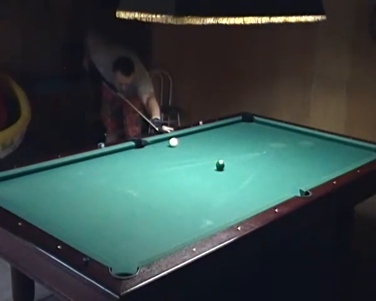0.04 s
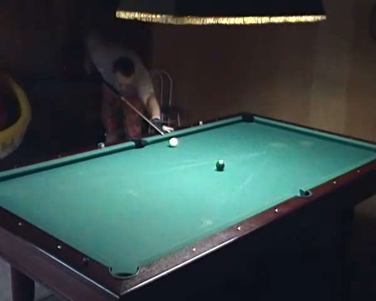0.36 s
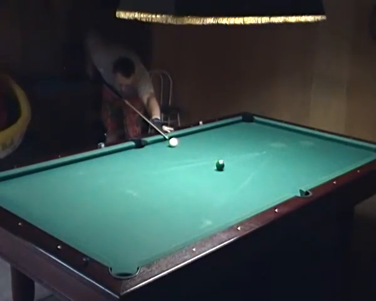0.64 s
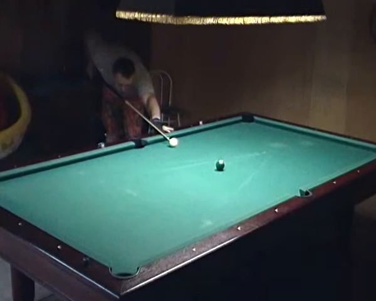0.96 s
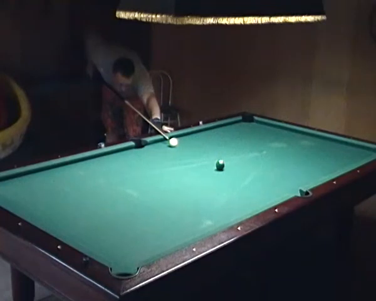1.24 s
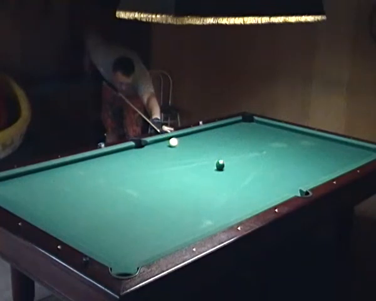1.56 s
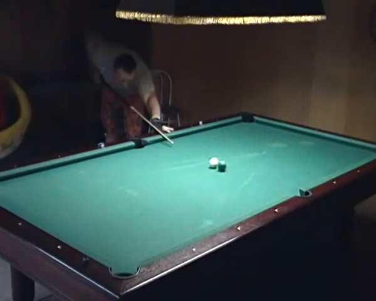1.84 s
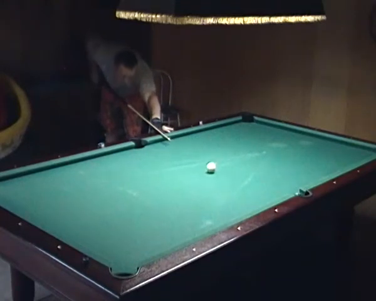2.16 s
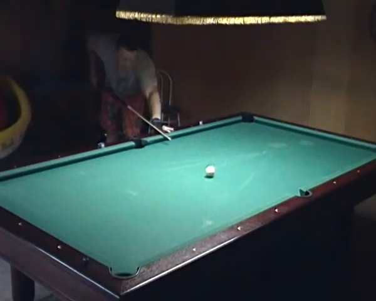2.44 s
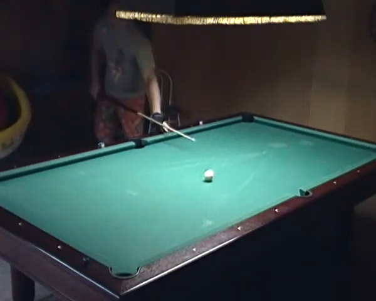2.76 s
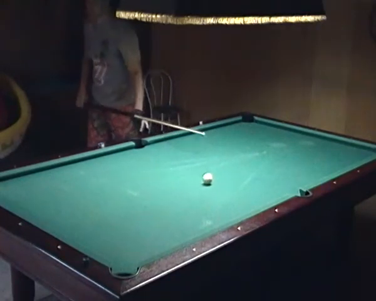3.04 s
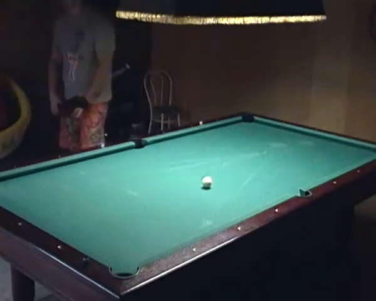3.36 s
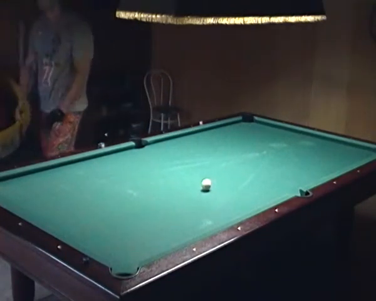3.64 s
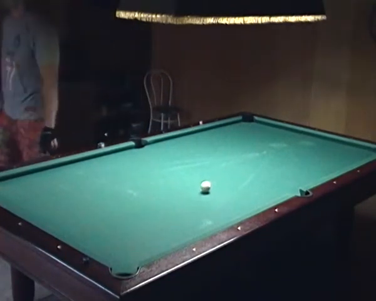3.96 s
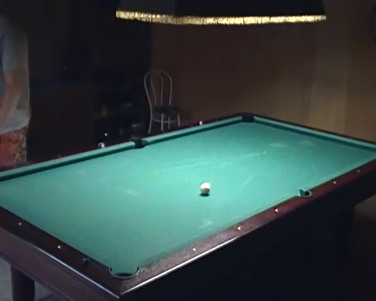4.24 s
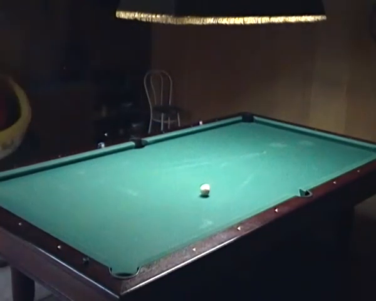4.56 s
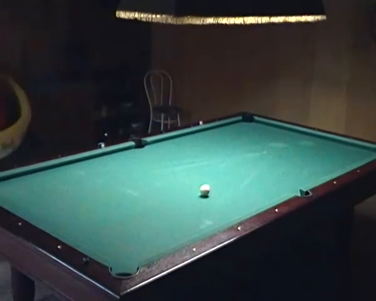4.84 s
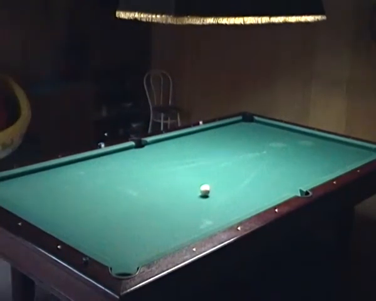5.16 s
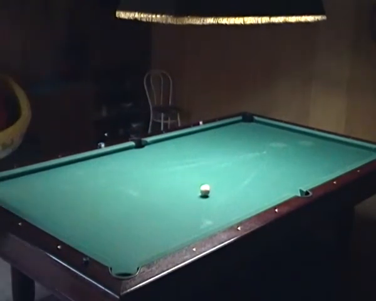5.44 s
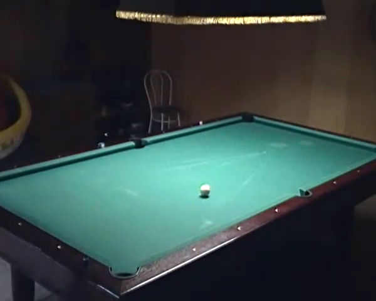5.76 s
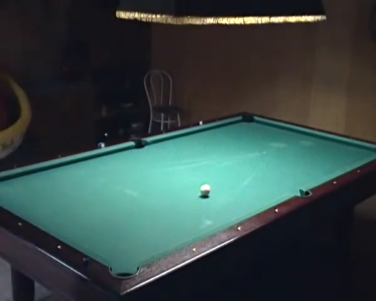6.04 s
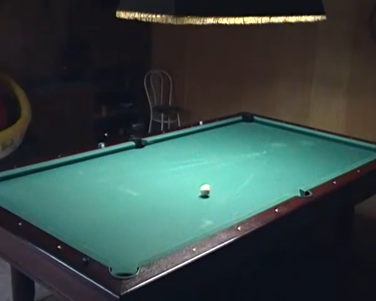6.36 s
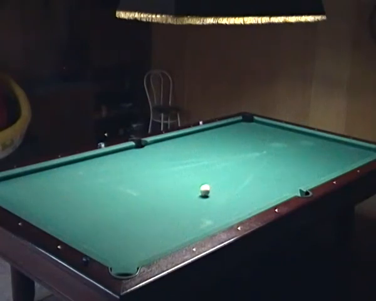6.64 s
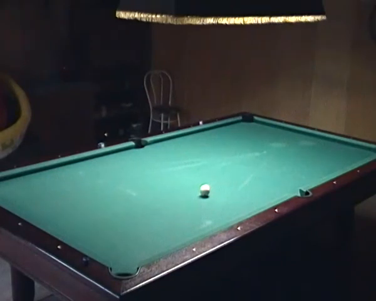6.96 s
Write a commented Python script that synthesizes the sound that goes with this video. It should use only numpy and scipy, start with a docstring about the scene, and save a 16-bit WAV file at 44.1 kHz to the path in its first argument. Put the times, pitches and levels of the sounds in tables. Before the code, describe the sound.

In a quiet games room with faint hiss and hum, a cue thuds against a pool ball. It slides briefly and clacks sharply into another, which slams into a pocket, knocks against other balls and rumbles down the chute. The player then shuffles off in softly slapping, skidding sandals, and something wooden knocks once. The microphone sounds slightly dull, and the loud hits are squashed, with a short room echo behind them.

```python
"""A pool shot in a quiet games room. Over air noise, hum and low rumble, the cue's impact rings shaft and
ball. The ball slides on the cloth and clacks into a second, which slams into a pocket, rings the table's
frame, knocks on the balls lying there and rumbles down the chute. The player shuffles off, soles slapping
and skidding, and something wooden knocks. Throughout, a limiter squashes the loud blows and, as it
recovers, lets the room's reverberation swell up behind them."""
import sys
import numpy as np
from scipy import signal
from scipy.fft import rfft, irfft, next_fast_len
from scipy.io import wavfile

SR = 44100
rng = np.random.default_rng(int(sys.argv[2]) if len(sys.argv) > 2 else 0)


def output_pcm(signal):
    """Save a mono or channel-first signal as 16-bit PCM at the path in sys.argv[1].

    Samples are clipped to [-1, 1] before scaling.
    """
    pcm = np.clip(np.atleast_2d(signal).T, -1, 1) * 32767
    wavfile.write(sys.argv[1], SR, np.round(pcm).astype(np.int16))


N = 313551
TIME = np.arange(N) / SR
EVENT_TIME = TIME[:SR // 2]


def amp(db):
    """Decibels to amplitude ratio."""
    return 10 ** (np.asarray(db) / 20)


def unit_rms(x):
    """Power normalisation to rms 1."""
    return x / np.sqrt(np.mean(x ** 2) + 1e-20)


def as_blow(x):
    """Energy normalisation to that of 10 ms at rms 1."""
    return x * np.sqrt(SR / 100 / np.sum(np.atleast_2d(x) ** 2, 1).mean())


def curve_at(points, hz):
    """Interpolation over log frequency."""
    known_hz, value = np.transpose(points)
    return np.interp(np.log(hz + 1), np.log(known_hz + 1), value)


def add(mix, start_s, sound):
    """Superposition: a sound joins the mix at its start time."""
    part = mix[:, round(start_s * SR):][:, :sound.shape[-1]]
    part += sound[..., :part.shape[1]]


def colour(x, spectrum, tilt_db=0, size=4096):
    """Minimum-phase filter with the given spectrum, tilted by tilt_db per octave about 2 kHz."""
    hz = abs(np.fft.fftfreq(size, 1 / SR))
    octaves = np.log2(np.maximum(hz, 200) / 2000)
    log_gain = np.log(amp(curve_at(spectrum, hz) + tilt_db * octaves))
    response = np.exp(np.conj(signal.hilbert(log_gain)))
    taps = np.fft.ifft(response).real[:size // 2]
    return signal.oaconvolve(np.atleast_2d(x), taps[None], axes=1)[:, :x.shape[-1]]


def band(x, hz, width_hz):
    """Two equal resonators in cascade, scaled to rms 1."""
    b, a = signal.iirpeak(hz, hz / width_hz, SR)
    return unit_rms(signal.lfilter(b, a, signal.lfilter(b, a, x)))


# Left-right likeness of a diffuse field: frequency_hz, coherence
FIELD_COHERENCE = [(100, 1), (600, 0.99), (1500, 0.98), (3000, 0.96), (5000, 0.81), (9000, 0.13)]
def diffuse(count, coherence=FIELD_COHERENCE):
    """Spatial coherence: white noise at two close microphones is alike in the bass, less in the treble."""
    size = next_fast_len(count)
    mid, side = rfft(rng.standard_normal((2, size)))
    alike = np.clip(curve_at(coherence, np.fft.rfftfreq(size, 1 / SR)), -1, 1)
    mid, side = mid * np.sqrt((1 + alike) / 2), side * np.sqrt((1 - alike) / 2)
    return irfft(np.array([mid + side, mid - side]), size)[:, :count]


def decay(t60):
    """Exponential damping: 60 dB down after t60 seconds."""
    return np.exp(-np.log(1000) * EVENT_TIME / np.maximum(t60, .001))


def burst(t60):
    """Scattering: a dying spray of tiny contacts or near reflections, whitened to favour no pitch."""
    spray = rfft(diffuse(len(EVENT_TIME)) * decay(t60))
    magnitude = np.sqrt(np.mean(abs(spray) ** 2, 0) + 1e-20)
    return as_blow(irfft(spray / magnitude, len(EVENT_TIME)) * decay(4 * t60))


def ring(modes, spread_db=0, detune=0):
    """Damped modes: the place of the blow varies their strength, the ball's weight shifts their pitch."""
    chance = rng.standard_normal((len(modes), 2))
    out = 0
    for k, ((hz, db, t60), (place, load)) in enumerate(zip(modes, chance)):
        tone = np.sin(2 * np.pi * hz * (1 + detune * load) * EVENT_TIME)
        out += (-1) ** k * amp(db + spread_db * place) * decay(t60) * tone
    return out


def grainy(grain_db, catches_per_s, grid_hz=2000):
    """Amplitude modulation of noise by small random catches of uneven strength."""
    grid_s = np.arange(0, 8, 1 / grid_hz)
    catches = rng.exponential(1, len(grid_s)) * (rng.random(len(grid_s)) < catches_per_s / grid_hz)
    return diffuse(N) * np.interp(TIME, grid_s, amp(grain_db * np.minimum(catches, 3)))


def strokes(rows, attack_s, sag_db, release_s):
    """Envelope for rows of start_s, length_s, level_db: each rises, sags over its length, then decays."""
    gain = np.zeros(N)
    for start, length, db in rows:
        age = np.maximum(TIME - start, 0)
        held = np.minimum(age / attack_s, 1) * amp(db - sag_db * np.minimum(age / length, 1))
        gain += held * np.exp(-np.maximum(age - length, 0) / release_s)
    return gain


def walking(start_s=3.37, ease_s=0.45):
    """Linear ramp: 0 while the player stands, 1 once the walk is under way."""
    return np.clip((TIME - start_s) / ease_s, 0, 1)


# Spectrum of room air and microphone hiss: frequency_hz, gain_db
AIR_SPECTRUM = [(12, -57), (20, -2.5), (92, 1.5), (168, -15), (203, -5.5), (226, -8), (259, -14),
                (572, -15), (692, -14.5), (934, -16.5), (1130, -17), (3180, -22), (8040, -24.5),
                (11800, -27), (13500, -66)]
# Left-right likeness of that noise: frequency_hz, coherence
AIR_COHERENCE = [(60, 1), (180, 0.65), (550, 0.32), (1650, 0.25), (4970, 0.072), (15000, 0.048)]
# Swells of the low rumble: start_s, length_s, level_db
RUMBLE_SWELLS = [(1.4, 0.15, -30.5), (1.7, 0.37, -39), (4.4, 1.1, -47.5), (5.56, 0.12, -33),
                 (6.15, 0.19, -37.5), (6.87, .17, -38)]
def background(hum_hz=199.8, whine_hz=7840, still_db=-45, walk_rise_db=4.5, rumble_trim_db=-3):
    """Noise floor: broadband air and hiss, a pure hum, and narrowband noise as whine and uneven rumble."""
    air = amp(-41.5) * unit_rms(colour(diffuse(N, AIR_COHERENCE), AIR_SPECTRUM))
    hum = amp(-53) * unit_rms(np.sin(2 * np.pi * hum_hz * TIME))
    whine = amp(-66.5) * band(rng.standard_normal(N), whine_hz, width_hz=37)
    sway = amp(still_db + walk_rise_db * walking())
    sway += strokes(RUMBLE_SWELLS, attack_s=0.082, sag_db=4, release_s=0.049)
    rumble = amp(rumble_trim_db) * sway * band(diffuse(N), hz=46, width_hz=67)
    return air + hum + whine + rumble


# Reverberation time of the room: frequency_hz, t60_s
ROOM_DECAY = [(100, 0.6), (500, 0.45), (1200, 0.4), (2500, 0.35), (5000, 0.29), (12000, 0.13)]
def reverberation(x, gap_s=0.0084, paths=3, handover_s=0.07):
    """Wall reflections follow a gap and decay band by band; moving sources reach other echo paths."""
    out = np.zeros((2, N))
    for k in range(paths):
        hz, age, bands = signal.stft(diffuse(SR // 2), SR, nperseg=256)
        absorption = np.exp(-np.log(1000) * age / curve_at(ROOM_DECAY, hz)[:, None])
        tail = signal.istft(bands * absorption, SR, nperseg=256)[1]
        tail *= np.interp(TIME[:tail.shape[1]], [0, gap_s, gap_s + 0.0007], [.15, .25, 1])
        turn = (TIME / handover_s + k) % paths
        share = np.sin(np.pi / 2 * np.minimum(turn, 2))  # equal-power crossfade between paths
        out += signal.oaconvolve(x * share, tail / np.linalg.norm(tail[0]), axes=1)[:, :N]
    return out


# Dry ticks and scrapes of cue, ball and player: start_s, level_db, centre_hz, width_hz, length_s
SLIP_TICKS = [(0.82, -42.5, 1090, 1500, 0.14), (1.783, -41.5, 2200, 3500, 0.032),
              (2.327, -39.5, 1670, 1500, 0.008), (2.983, -44, 1600, 1500, 0.015),
              (4.397, -37, 5600, 1200, 0.05), (4.911, -36.5, 2740, 1100, 0.021),
              (5.106, -39.5, 6030, 3500, 0.0087), (5.172, -30.5, 5550, 5000, 0.01),
              (6.04, -27.5, 4400, 3060, 0.016), (6.152, -33, 1540, 2500, 0.0063),
              (6.255, -40, 6000, 8000, 0.0053), (6.3466, -32, 920, 810, 0.0063),
              (6.593, -35.5, 1070, 650, 0.01)]
# Soft low bumps: start_s, level_db, pitch_hz, t60_s
LOW_BUMPS = [(1.78, -20.5, 208, 0.13), (5.234, -34, 142, 0.073), (6.845, -21, 58.5, 0.14)]
def ticks_and_bumps():
    """Single resonances: driven by a brief slip for a tick, swelling and dying away for a bump."""
    out = np.zeros((2, N))
    for start, db, hz, width_hz, length in SLIP_TICKS:
        slip = diffuse(len(EVENT_TIME)) * np.exp(-(2 * EVENT_TIME / length - 1) ** 4)
        add(out, start, amp(db) * as_blow(band(slip, hz, width_hz)))
    for start, db, hz, t60 in LOW_BUMPS:
        add(out, start, amp(db) * as_blow(ring([(hz, 0, t60)]) * (1 - decay(t60))))
    return out


# Clothes rubbing: start_s, length_s, level_db
CLOTHES_RUBS = [(3.08, 0.19, -40.5), (4.93, 0.046, -37.5), (5.08, 0.14, -41), (6.06, 0.32, -44.5),
                (6.74, .07, -45), (6.86, 0.086, -41.5)]
# Soles skidding: start_s, level_db, t60_s, tilt_db_per_octave
SOLE_SKIDS = [(3.819, -34, 0.21, 0.5), (4.305, -27.5, 0.61, -1), (4.891, -25.5, 0.26, 1.5),
              (5.521, -30.5, 0.44, 2.5), (6.821, -25.5, 0.11, 2.5)]
# Friction spectrum of rubs and skids: frequency_hz, gain_db
SCUFF_SPECTRUM = [(200, -27), (450, -2), (1000, -1.5), (1800, -3.5), (3000, -6), (5700, -3), (8000, -6.5),
                  (11000, -13), (14000, -78)]
# Soles dragging: start_s, length_s, level_db
SOLE_DRAGS = [(6.14, 0.31, -42), (6.83, 0.21, -40.5)]
# Friction spectrum of a drag: frequency_hz, gain_db
DRAG_SPECTRUM = [(150, -2), (330, -22), (460, 4.5), (1000, -7), (1900, -5), (3500, -10), (9000, -17.5)]
# Sandals slapping the floor: start_s, level_db, t60_s, tilt_db_per_octave
SANDAL_SLAPS = [(3.454, -31, 0.19, 4.5), (4.062, -31, 0.14, 3.5), (4.646, -24.5, 0.073, 0.5),
                (4.662, -28.5, 0.029, 3), (5.195, -25.5, 0.11, 1)]
# Impact spectrum of a slap: frequency_hz, gain_db
SLAP_SPECTRUM = [(40, -27), (100, -4), (220, 2.5), (380, -15.5), (720, -5.5), (1100, -2), (1550, -3),
                 (2200, -10), (3000, -15), (5600, -18.5), (7000, -25), (12000, -39)]
def player(rustle_db=-46.5, scuff_trim_db=-3):
    """Friction and impact noise of walking: clothes rub, and sandals skid, drag and slap."""
    rubbing = amp(rustle_db) * walking() + strokes(CLOTHES_RUBS, attack_s=0.03, sag_db=1, release_s=0.049)
    catches = grainy(grain_db=5.2, catches_per_s=150)
    out = amp(scuff_trim_db) * rubbing * unit_rms(colour(catches, SCUFF_SPECTRUM))
    for start, db, t60, tilt_db in SOLE_SKIDS:
        friction = np.roll(catches, -round(start * SR), 1)[:, :len(EVENT_TIME)]
        rasp = unit_rms(colour(friction, SCUFF_SPECTRUM, tilt_db))
        envelope = as_blow(decay(t60) * (1 - decay(0.047)))
        add(out, start, amp(db + scuff_trim_db) * envelope * rasp)
    grit = unit_rms(colour(grainy(grain_db=4.5, catches_per_s=150), DRAG_SPECTRUM))
    out += strokes(SOLE_DRAGS, attack_s=0.013, sag_db=4, release_s=0.055) * grit
    for start, db, t60, tilt_db in SANDAL_SLAPS:
        slap = burst(t60) * (1 - decay(t60 / 4))  # the sole rolls on to the floor
        add(out, start, amp(db) * as_blow(colour(slap, SLAP_SPECTRUM, tilt_db)))
    return out


# A knock of hard wood, perhaps the cue being stood down: start_s, level_db
WOOD_KNOCKS = [(5.767, -17.5)]
# Spectrum of its hollow clack: frequency_hz, gain_db
WOOD_SPECTRUM = [(200, -8), (450, -15), (1000, -3.5), (1700, 4.5), (2300, -11), (2900, -6.5), (3500, -15),
                 (4400, -6.5), (5700, -10), (6500, -31), (9000, -18), (13000, -42)]
# Modes of the wood: pitch_hz, level_db, t60_s
WOOD_MODES = [(1470, 2, 0.0067), (5640, -3, 0.015)]
def wood_knock(ring_db=-6, chatter_s=0.022):
    """Contact chatter: hard wood rebounds on hard wood, giving a hollow clack with a brief ring."""
    out = np.zeros((2, N))
    for start, db in WOOD_KNOCKS:
        clack = as_blow(colour(burst(chatter_s) * (1 - decay(0.0021)), WOOD_SPECTRUM))
        add(out, start, amp(db) * as_blow(clack + amp(ring_db) * as_blow(ring(WOOD_MODES))))
    return out


# The sunk ball judders, then rolls: start_s, length_s, level_db
CHUTE_ROLLS = [(2.455, 0.084, -23.5), (2.6, 0.27, -34.5)]
# Resonances of the chute: frequency_hz, gain_db
CHUTE_SPECTRUM = [(40, -9.5), (90, 9), (119, -3), (197, 2), (324, -15.5), (369, -6.5), (403, -8.5),
                  (500, 1), (570, -20.5), (678, -1), (861, -7.5), (1420, -7), (4210, -25), (9000, -35),
                  (13000, -90)]
def rolling():
    """Rolling noise: the sunk ball's judder excites the resonances of the wooden chute."""
    judder = grainy(grain_db=4, catches_per_s=200)
    descent = strokes(CHUTE_ROLLS, attack_s=0.0051, sag_db=-2, release_s=0.046)
    return descent * unit_rms(colour(judder, CHUTE_SPECTRUM))


# A struck ball slides until it rolls freely: start_s, length_s, level_db
BALL_SLIDES = [(1.838, 0.11, -2.5), (2.02, 0.061, -15.5)]
# Response of the cloth-covered slate: frequency_hz, gain_db
SLATE_SPECTRUM = [(20, -29), (90, -3), (140, -10), (210, 1.5), (340, -22), (490, 8), (680, 5.5),
                  (1000, -11.5), (1500, -15), (3000, -39), (8000, -70)]
def sliding(fast_tilt_db=3, slow_tilt_db=-6):
    """Sliding friction: a ball's murmur on cloth and slate darkens as the slip dies down."""
    out = np.zeros((2, N))
    for start, length, db in BALL_SLIDES:
        rub = diffuse(len(EVENT_TIME))
        bright = unit_rms(colour(rub, SLATE_SPECTRUM, fast_tilt_db))
        dark = unit_rms(colour(rub, SLATE_SPECTRUM, slow_tilt_db))
        slowed = np.minimum(EVENT_TIME / length, 1)
        murmur = (1 - slowed) * bright + slowed * dark
        envelope = strokes([(0.0045, length, db)], attack_s=0.01, sag_db=14.5, release_s=0.014)
        add(out, start, murmur * envelope[:len(EVENT_TIME)])
    return out


# Ball against pocket: start_s, rattle_db, thump_db
POCKET_KNOCKS = [(2.33, -60, -25), (2.356, -11.5, -9.5), (2.372, -20.5, -19), (2.413, -25, -42),
                 (2.489, -26, -24), (2.545, -26, -34), (2.567, -40, -20), (2.644, -22, -21.5),
                 (2.676, -40, -25), (2.7221, -30, -37), (2.7778, -29, -27), (2.794, -42, -22.5),
                 (2.8262, -32, -31)]
# Spectrum of the pocket's liner: frequency_hz, gain_db
LINER_SPECTRUM = [(100, -15), (500, 11), (900, 8), (1500, 10.5), (2500, 9.5), (3800, 3.5), (5700, 3),
                  (8000, -6), (11000, -14), (14000, -66)]
# Modes of the table's frame: pitch_hz, level_db, t60_s
TABLE_MODES = [(88, -12, 0.27), (161, -4, 0.16), (197.8, -1, 0.11), (271, -8, 0.067), (481, -2, 0.077),
               (650, -7, 0.062), (784, -9, 0.069)]
def pocket():
    """Structure-borne sound: each knock rattles the pocket's liner and rings the table's frame."""
    out = np.zeros((2, N))
    for start, rattle_db, thump_db in POCKET_KNOCKS:
        rattle = burst(0.076) * (1 - decay(0.0014))
        add(out, start, amp(rattle_db) * as_blow(colour(rattle, LINER_SPECTRUM)))
        push = 1 - decay(0.068)  # the padded liner takes up the ball gradually
        frame = ring(TABLE_MODES, spread_db=2, detune=.04)
        add(out, start, amp(thump_db) * as_blow(push * frame))
    return out


# Cue tip on the ball: start_s, level_db
CUE_STRIKES = [(1.8316, -7.5)]
# Modes of shaft and ball: pitch_hz, level_db, t60_s
SHAFT_BALL_MODES = [(264, -5, 0.057), (507, -14, 0.053), (683, -14, 0.075), (972, 3.5, 0.033),
                    (1385, 7, 0.0098), (1955, -7, 0.021), (2860, -6.5, 0.015)]
# Spectrum of crunching chalk: frequency_hz, gain_db
CHALK_SPECTRUM = [(500, -23), (1500, -10), (3000, -5), (3900, -11), (4500, -7), (6300, -12.5), (8000, -15),
                  (12000, -34)]
def cue(chalk_db=-17, scatter_db=-6, onset_s=0.016):
    """Compliant impact: the leather tip gives a little, then rings shaft and ball as chalk crunches."""
    out = np.zeros((2, N))
    for start, db in CUE_STRIKES:
        crunch = as_blow(colour(burst(0.22), CHALK_SPECTRUM))
        knock = as_blow(ring(SHAFT_BALL_MODES) * (1 - decay(onset_s)))
        # rails and slate throw the knock back within milliseconds
        reflected = as_blow(signal.oaconvolve(burst(0.021), knock[None], axes=1))[:, :len(EVENT_TIME)]
        add(out, start, amp(db) * (knock + amp(scatter_db) * reflected + amp(chalk_db) * crunch))
    return out


# Ball against ball: start_s, level_db, tilt_db_per_octave, scatter_db
BALL_COLLISIONS = [(2.0073, 5.5, 1, 3.5), (2.4414, -9, -3, 16), (2.459, -20, -2.5, 0), (2.547, -19, -4, 19)]
# Spectrum of the contact pulse: frequency_hz, gain_db
CLACK_SPECTRUM = [(100, -39), (400, -24.5), (1000, -3), (1600, -1.5), (2400, 5), (3100, -3), (4050, -15),
                  (5200, -32), (9000, -44), (16000, -65)]
def clacks():
    """Elastic collision: hard balls touch for under a millisecond; slate and pocket scatter the pulse."""
    out = np.zeros((2, N))
    for start, db, tilt_db, scatter_db in BALL_COLLISIONS:
        pulse = as_blow(signal.unit_impulse(len(EVENT_TIME))) + amp(scatter_db) * burst(.024)
        add(out, start, amp(db) * as_blow(colour(pulse, CLACK_SPECTRUM, tilt_db)))
    return out


def scene(table_send_db=-3, player_send_db=-5, near_send_db=-11):
    """Direct and reverberant fields add in one room: the nearer a source, the drier it sounds."""
    table = cue() + clacks() + pocket() + sliding() + rolling()
    walk = player() + wood_knock()
    near = ticks_and_bumps()
    echo = reverberation(amp(table_send_db) * table + amp(player_send_db) * walk + amp(near_send_db) * near)
    balance = amp([[-.4], [.4]])
    return (table + walk + near + echo + background()) * balance


def lag(x, time_constant_s):
    """First-order exponential smoothing."""
    pole = np.exp(-1 / (time_constant_s * SR))
    return signal.lfilter([1 - pole], [1, -pole], x)


def low_pass(x, hz, size):
    """Band limiting with a linear-phase windowed sinc."""
    taps = signal.firwin(size, hz, window=("kaiser", 8), fs=SR)
    return signal.oaconvolve(x, taps[None], "same")


def record(dry, limit_db=-12, recovery_db_per_s=125, ceiling=0.88):
    """Dynamic range compression: dull microphones feed a fast limiter; peaks that slip past it clip."""
    dulled = low_pass(dry, hz=12400, size=101)
    power_db = 10 * np.log10(lag((dulled ** 2).mean(0), .005) + 1e-12)
    recovery_db = recovery_db_per_s * TIME
    held_db = np.maximum.accumulate(power_db + recovery_db) - recovery_db  # each peak falls off steadily
    over_db = np.maximum(held_db - limit_db, 0)
    ducked = dulled / amp(lag(over_db, .0008))
    return low_pass(np.clip(ducked, -ceiling, ceiling), hz=16500, size=255)


dry = scene()
out = record(dry)
output_pcm(out)
```